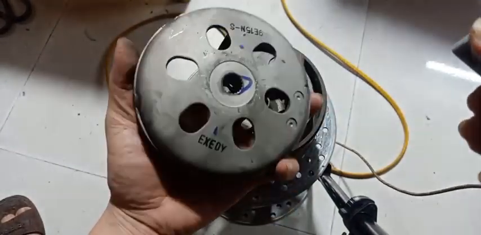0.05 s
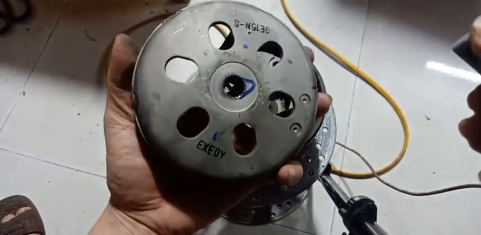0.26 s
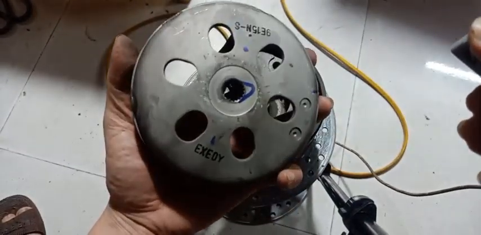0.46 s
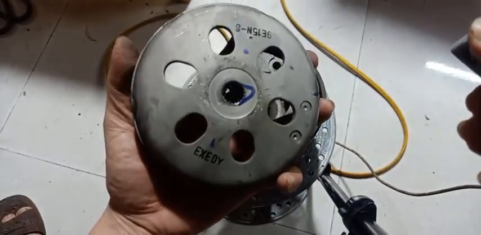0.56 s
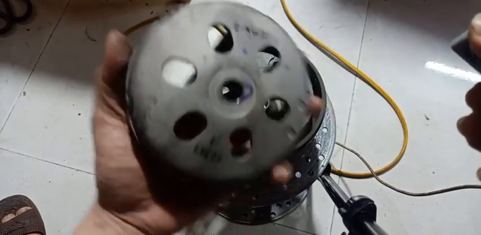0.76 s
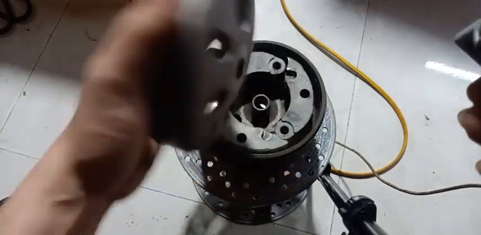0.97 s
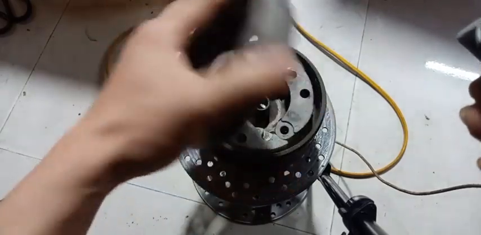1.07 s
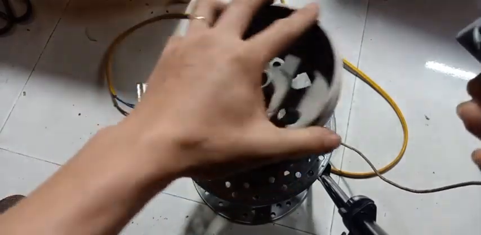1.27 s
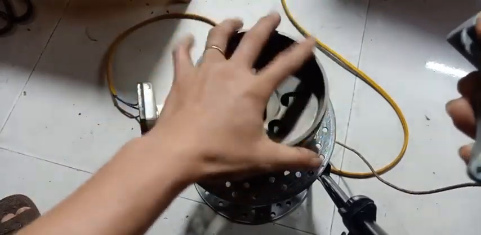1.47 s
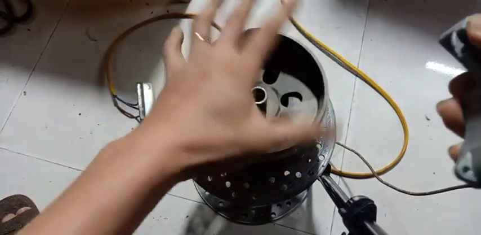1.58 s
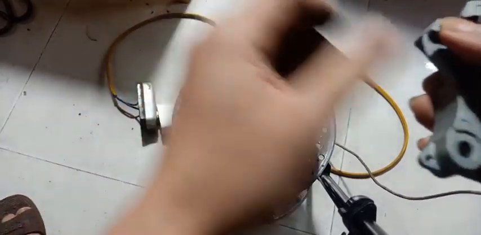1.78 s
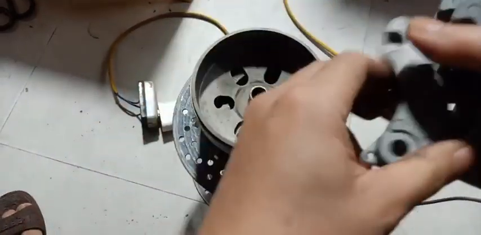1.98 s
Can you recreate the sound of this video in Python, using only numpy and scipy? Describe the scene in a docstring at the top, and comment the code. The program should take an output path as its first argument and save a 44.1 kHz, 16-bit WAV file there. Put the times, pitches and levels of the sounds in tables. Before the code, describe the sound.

One hard metallic clank, two nearly merged blows, as a steel drum-shaped part lands on metal parts; before it a faint motorbike swells outside, then recedes. Tiled room, close phone microphone, slightly overloaded.

```python
"""A steel drum-shaped part is set down on other metal parts on a tiled floor: rim first, then flat.
Each blow sums decaying sine modes, a noise crack and a short low pulse, mostly left, as that microphone
overloads; a noisy tail follows the second. Outside a motorbike draws near and moves off: mid throb and
road hiss swell, then fall; the firing rate drops while the low throb grows. Throb is multiples of that rate;
hiss, two thin tones and rumble are shaped noise. A two-microphone phone held close rounds the hardest peaks."""
import sys
import numpy as np
from scipy import signal
from scipy.fft import rfft, irfft
from scipy.io import wavfile
from scipy.ndimage import uniform_filter1d

SR = 44100
rng = np.random.default_rng(int(sys.argv[2]) if len(sys.argv) > 2 else 0)


def bounce(signal):
    """Save signal as a 16-bit WAV file at the path given by the first command-line argument."""
    frames = np.transpose(np.atleast_2d(signal))
    limited = np.clip(frames, -1, 1)
    pcm = np.round(limited * 32767).astype(np.int16)
    wavfile.write(sys.argv[1], SR, pcm)


N = 90272

# Motorbike passing: (time [s], firing rate [Hz], low throb [dB], mid throb [dB], road hiss [dB], rumble [dB])
BIKE_PASS = [(0, 34.97, -61.5, -66.5, -54.5, -52.5), (.2, 34.67, -63, -65, -55, -55),
             (.36, 35.2, -66.5, -63, -54, -56), (.45, 35, -82, -67.5, -52.5, -51),
             (.56, 35.09, -60, -62, -52.5, -54.5), (.66, 34.97, -66, -57.5, -50.5, -53.5),
             (.78, 35.17, -75, -55, -50, -57.5), (.87, 35, -69, -58, -46.5, -51),
             (1.0, 34.91, -77, -53, -49, -49), (1.1, 34.92, -64, -50.5, -46, -52),
             (1.23, 35.14, -64, -52.5, -45.5, -51), (1.41, 35, -71, -54, -44, -46.5),
             (1.57, 34.02, -70, -59, -49, -52.5), (1.7, 32.74, -61.5, -64.5, -50.5, -53),
             (1.85, 32.28, -52, -67, -58.5, -58.5), (2.05, 32.1, -57, -64, -54.5, -61)]
# Tone of the low throb: (frequency [Hz], relative level [dB])
LOW_THROB = [(50, -22), (95, -2), (140, -1), (200, -25)]
# Tone of the mid throb from the exhaust pipe: (frequency [Hz], relative level [dB])
PIPE_THROB = [(120, -22), (175, -4), (210, 0), (245, -4), (320, -5.5), (550, -11.5), (900, -7), (1200, -34)]
# Colour of the road hiss: (frequency [Hz], relative level per Hz [dB])
HISS_COLOUR = [(350, -26), (600, -17.5), (697, -51.5), (927, -6), (1430, -9), (2400, -4.5), (2610, -12),
               (2830, -8), (3520, -13.5), (5980, -13), (9240, -37), (9890, -42), (13300, -34), (15500, -90)]
# Thin tones that ring along with the street noise: (centre [Hz], width [Hz], relative level [dB])
THIN_TONES = [(2581, 18, 0), (2635, 24, 1)]
# Colour of the rumble: (frequency [Hz], relative level per Hz [dB])
RUMBLE_COLOUR = [(25, -16), (60, -9), (136, -5), (350, -9.5), (550, -6), (720, -5.5), (950, -10),
                 (1500, -17), (2500, -28), (3300, -72)]

# Blows of the part: (time [s], ring level [dB], crack level [dB], crack t60 [s], low pulse level [dB])
BLOWS = [(1.5053, -6, -6, 0.046, -33), (1.5173, 1, -7, 0.1, -4)]
# Pitches of the part's modes: (frequency [Hz])
MODE_HZ = [2230, 2370, 2575, 2627, 2706, 3209, 3500, 3918, 4130, 4154, 4418, 4592, 4700, 4980, 5365, 6125,
           6788, 7280, 7477, 8205, 8750, 4170]
# Ring of those modes, in the same order: (relative level [dB], t60 [s], left minus right [dB])
MODE_RING = [(-48, 0.36, -3), (-44.5, 0.9, -8), (-4, 0.017, 9), (-31.5, 0.74, 3), (-18.5, 0.075, -15),
             (-31, .15, 7), (-34, 0.203, -1), (-14.5, 0.1, 5), (-35, 0.76, -4), (-10, 0.19, 0.5),
             (-35, .2, -23), (-19.5, 0.25, -4), (-29.5, 0.32, -14), (-15.5, 0.22, -6), (-27, 0.22, -18),
             (-23.5, 0.13, 10.5), (-30, .09, 20), (-40.5, 0.34, -11), (-45, .2, 0), (-39.5, 0.15, 15),
             (-32, .14, 10.5), (-27, 0.43, 6)]
# Colour of the crack: (frequency [Hz], relative level per Hz [dB])
CRACK_COLOUR = [(150, -2), (400, -6.5), (700, -1), (1000, -6), (1300, -10.5), (1600, 1), (2500, 2),
                (3300, -1.5), (4200, -7), (6000, -2.5), (7000, -12.5), (9000, -26), (10000, -43),
                (11300, -14), (13000, -16.5), (14300, -33), (15500, -43)]
# Sines of the low overload pulse: (frequency [Hz])
PULSE_HZ = [155, 370, 620, 950]
# Decay of those sines, in the same order: (relative level [dB], t60 [s])
PULSE_DECAY = [(-24, .07), (-10, .022), (-5, .018), (1, .016)]
# Colour of the tail: (frequency [Hz], relative level per Hz [dB])
TAIL_COLOUR = [(100, 16), (300, 7.5), (900, -5), (1500, -11.5), (2050, -8), (2300, 0.5), (2700, -3),
               (3000, -9.5), (3500, -15), (4200, -4.5), (5000, -7.5), (6200, -6.5), (6700, -22),
               (8000, -19), (9200, -24), (10000, -41), (11300, -23), (13000, -23), (14200, -32),
               (15000, -49)]
# Decay of the tail: (frequency [Hz], t60 [s])
TAIL_T60 = [(100, 0.1), (500, 0.13), (1200, 0.38), (2400, 0.7), (4500, 0.83), (7000, 0.66), (12000, 0.5)]

# Likeness of noise at the two microphones: (frequency [Hz], share in common before scaling [0 to 1])
LIKENESS = [(60, 1), (500, 0.63), (2000, 0.44), (6000, 0.2), (12000, 0.68)]
# Treble balance of noise: (frequency [Hz], left minus right [dB])
TREBLE_LEFT = [(6000, -0.5), (15000, 3.5)]

# Motorbike: _DB in dB, _PER_S in random levels per second
CYCLE_SCATTER, PUFF_DEPTH = .004, .08  # fractions of the firing rate and of the hiss level
WAVER_DB, WAVER_PER_S = 3.5, 4.94
FLICKER_DB = .5
THIN_TONES_DB, THIN_TONES_WAVER_DB = -3, 2.5
LEFT_LAG_S, STREET_PAN_DB = 0.00044, 2.5

# Clank: pans are left minus right in dB
RISE_S = 0.00052  # time constant of every onset, and of stopping a ring
RING_WAVER_DB, RING_WAVER_PER_S = 3, 60
MODE_TURN_SPREAD = .6  # phase scatter at each microphone [radians]
CRACK_PAN_DB, PULSE_PAN_DB, PULSE_LATE_S = 3, 14, .0006
TAIL_DB, TAIL_PAN_DB = -17.5, 2.5
CLANK_LIKENESS = 0.2  # scales the share in common

# Phone
CLIP_DRIVE, BASS_CUT_HZ, TOP_HZ = 0.94, 70, 15700


def undb(db):
    """Turn dB into gain."""
    return 10 ** (np.asarray(db) / 20)


def level(x, db):
    """Set the rms level in dB, taken over both channels together."""
    return x * undb(db) / np.sqrt(np.mean(x ** 2))


def at(table, hz):
    """Read a (frequency, value) table on a log-frequency axis."""
    table_hz, values = np.array(table).T
    return np.interp(np.log(np.maximum(hz, 1)), np.log(table_hz), values)


def pan(db):
    """Left and right gains for a level difference in dB."""
    return undb(np.array([[db], [-db]]) / 2)


def band(x, hz, width_hz):
    """Resonance with gain 1 at the centre."""
    b, a = signal.iirpeak(hz, hz / width_hz, fs=SR)
    return signal.lfilter(b, a, x)


def late(x, lag_s):
    """Delay the left channel by turning its phase in proportion to frequency."""
    f = np.arange(N // 2 + 1) * SR / N
    lags = np.array([[lag_s], [0]])
    return irfft(rfft(x * np.ones((2, 1))) * np.exp(-2j * np.pi * f * lags), N)


def noise(colour, likeness=1):
    """Coloured stereo noise of rms 1, partly common to both microphones and later at the left."""
    f = np.arange(N // 2 + 1) * SR / N
    common = np.clip(likeness * at(LIKENESS, f), 0, 1)
    white = rfft(rng.standard_normal((3, N)))
    mixed = np.sqrt(common) * white[0] + np.sqrt(1 - common) * white[1:]
    # Thin out below the first colour point, silence an octave below it
    lowest_hz = colour[0][0]
    edge = (f > lowest_hz / 2) * np.minimum(f / lowest_hz, 1) ** 2
    balance = undb(np.array([[.5], [-.5]]) * at(TREBLE_LEFT, f))
    x = irfft(mixed * undb(at(colour, f)) * edge * balance, N)
    return late(level(x, 0), LEFT_LAG_S)


def walk(rate):
    """Random levels held 1 / rate s and slewed twice; spread near 1."""
    hold = int(SR / rate)
    steps = np.repeat(rng.standard_normal(N // hold + 1), hold)
    return 1.3 * uniform_filter1d(uniform_filter1d(steps, hold), hold)[:N]


def fade(t, t60):
    """Quick rise at t = 0, times an exponential fall of 60 dB per t60."""
    u = np.maximum(t, 0)
    return (1 - np.exp(-u / RISE_S)) * undb(-60 * u / t60)


def engine_throb(hz, phase, low_db, mid_db):
    """Multiples of the firing rate, shaped by two tone curves, waver as echoes shift."""
    throb = 0
    for k in range(2, 30):
        low = undb(low_db + at(LOW_THROB, k * hz)) * (k < 7)
        mid = undb(mid_db + at(PIPE_THROB, k * hz)) * (k > 2)
        waver = undb(WAVER_DB * walk(WAVER_PER_S))
        throb = throb + (low + mid) * waver * np.sin(k * phase + rng.uniform(0, 2 * np.pi))
    return late(throb, LEFT_LAG_S)


def road_hiss(phase, hiss_db):
    """Coloured noise puffs at the firing rate and flickers slightly."""
    puffs = 1 + PUFF_DEPTH * np.cos(phase)
    return noise(HISS_COLOUR) * puffs * undb(FLICKER_DB * walk(14.9)) * undb(hiss_db)


def thin_tones(mid_db):
    """Narrow resonances of noise make two faint tones near 2.6 kHz whose level follows the mid throb."""
    source = noise([(1000, 0), (8000, 0)])
    gain = undb(mid_db + THIN_TONES_DB + THIN_TONES_WAVER_DB * walk(6.21))
    return gain * sum(level(band(source, hz, width_hz), db) for hz, width_hz, db in THIN_TONES)


def motorbike(t):
    """One firing phase drives throb and puffs, with thin tones and rumble alongside."""
    times, *columns = np.array(BIKE_PASS).T
    hz, low_db, mid_db, hiss_db, rumble_db = (np.interp(t, times, column) for column in columns)
    phase = 2 * np.pi * np.cumsum(hz * (1 + CYCLE_SCATTER * walk(30))) / SR
    throb = engine_throb(hz, phase, low_db, mid_db)
    hiss = road_hiss(phase, hiss_db)
    tones = thin_tones(mid_db)
    rumble = noise(RUMBLE_COLOUR) * undb(rumble_db)
    return (throb + hiss + tones + rumble) * pan(STREET_PAN_DB)


def ring(u, ring_db):
    """The struck part rings in decaying sine modes that waver separately at each microphone."""
    out = 0
    for hz, (db, t60, pan_db) in zip(MODE_HZ, MODE_RING):
        waver = RING_WAVER_DB * np.array([walk(RING_WAVER_PER_S), walk(RING_WAVER_PER_S)])
        turn = rng.uniform(0, 2 * np.pi) + MODE_TURN_SPREAD * rng.standard_normal((2, 1))
        gain = undb(ring_db + db + waver) * pan(pan_db) * fade(u, t60)
        out = out + gain * np.sin(2 * np.pi * hz * u + turn)
    return out


def low_pulse(u, pulse_db):
    """Short low overload pulse, mostly in the left microphone: decaying sines just after the blow."""
    v = u - PULSE_LATE_S
    out = 0
    for hz, (db, t60) in zip(PULSE_HZ, PULSE_DECAY):
        out = out + undb(pulse_db + db) * fade(v, t60) * np.sin(2 * np.pi * hz * v)
    return out * pan(PULSE_PAN_DB)


def clank_tail(u, source):
    """The room and the parts below carry noise whose half-octave bands die at their own rates."""
    f = np.arange(N // 2 + 1) * SR / N
    spectrum = rfft(source)
    out = 0
    for k in range(15):
        # Overlapping triangular bands, centred half an octave apart from 100 Hz up
        share = np.clip(1 - np.abs(2 * np.log2(np.maximum(f, 1) / 100) - k), 0, 1)
        t60 = at(TAIL_T60, 100 * 2 ** (k / 2))
        out = out + fade(u, t60) * irfft(spectrum * share, N)
    return out * undb(TAIL_DB) * pan(TAIL_PAN_DB)


def clank(t):
    """Each blow rings, cracks and sets off a low pulse, and stops the ring of the one before."""
    crack = noise(CRACK_COLOUR, CLANK_LIKENESS)
    tail = noise(TAIL_COLOUR, CLANK_LIKENESS)
    out = 0
    stops = [blow[0] for blow in BLOWS[1:]] + [t[-1]]
    for (start, ring_db, crack_db, crack_t60, pulse_db), stop in zip(BLOWS, stops):
        u = t - start
        free = np.exp(-np.maximum(t - stop, 0) / RISE_S)
        out = out + free * ring(u, ring_db) + low_pulse(u, pulse_db)
        out = out + undb(crack_db) * fade(u, crack_t60) * crack * pan(CRACK_PAN_DB)
    return out + clank_tail(t - BLOWS[1][0], tail)


def scene():
    """The street outside and the clank close by."""
    t = np.arange(N) / SR
    return motorbike(t) + clank(t)


def record(dry):
    """The phone rounds the loudest peaks, thins the bass and cuts the top."""
    rounded = np.tanh(CLIP_DRIVE * dry) / CLIP_DRIVE
    bass_cut = signal.butter(2, BASS_CUT_HZ, "high", fs=SR, output="sos")
    top_cut = signal.ellip(8, .2, 70, TOP_HZ, fs=SR, output="sos")
    return signal.sosfilt(top_cut, signal.sosfilt(bass_cut, rounded))


dry = scene()
out = record(dry)
bounce(out)
```